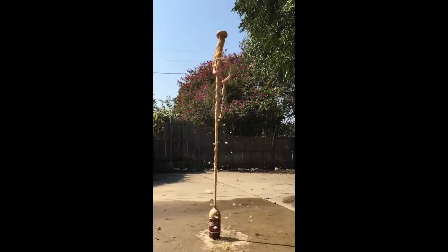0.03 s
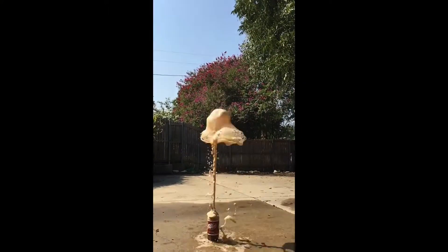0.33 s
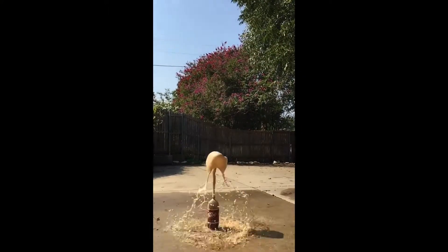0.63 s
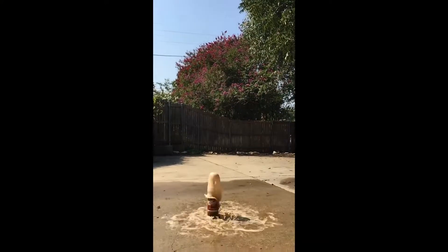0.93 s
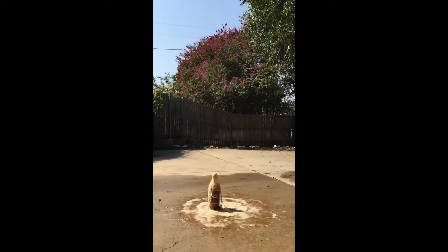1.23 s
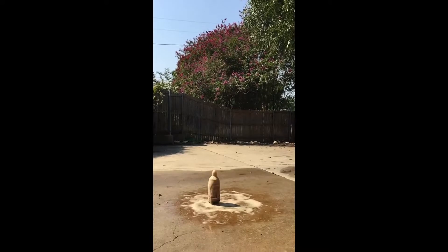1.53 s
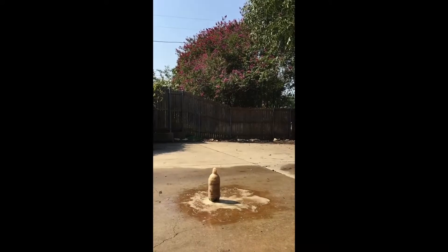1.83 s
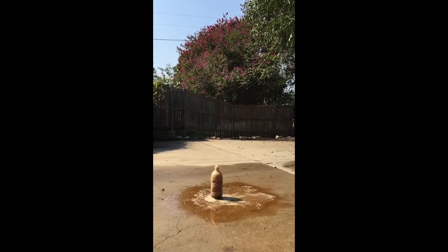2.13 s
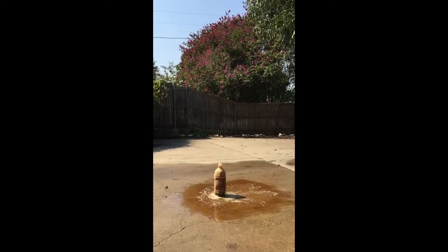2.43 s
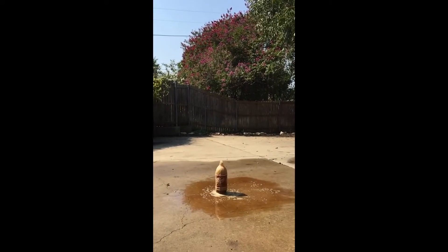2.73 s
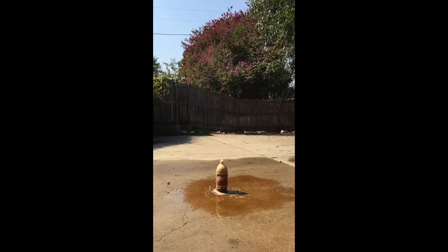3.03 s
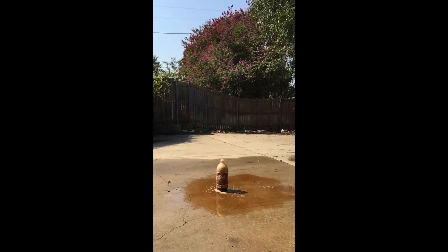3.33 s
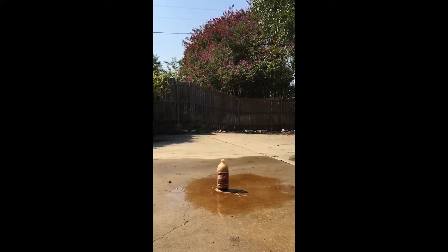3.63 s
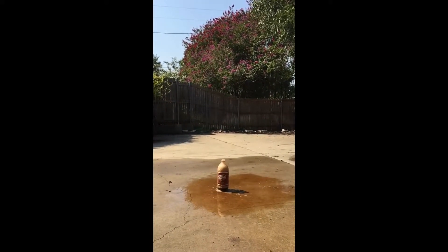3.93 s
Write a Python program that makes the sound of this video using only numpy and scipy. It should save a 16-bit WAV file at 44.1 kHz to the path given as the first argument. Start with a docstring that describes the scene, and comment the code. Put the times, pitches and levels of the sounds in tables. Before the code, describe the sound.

Falling soda slaps and splashes on concrete nearby, ending in a crackling splash of foam. The puddle fizzes softly and drips while birds whistle and twitter across the yard and faraway traffic rumbles faintly.

```python
"""A fountain of soda sinks back into its bottle on a concrete patio. Blobs slap the ground amid fine spray,
a sheet of foam lands at once, and gushes stir bubbles in the puddle, which goes on fizzing and dripping.
A bird whistles falling notes down the yard; others call and twitter farther off.
Distant traffic rumbles throughout, and a faint rush swells at the end."""
import sys
import numpy as np
from scipy import signal
from scipy.fft import rfft, irfft
from scipy.io import wavfile

SR = 44100
rng = np.random.default_rng(int(sys.argv[2]) if len(sys.argv) > 2 else 0)


def unload_audio(sound):
    """Save the sound as a 16-bit wav file, at the path given as the first command line argument."""
    columns = np.transpose(np.atleast_2d(sound))
    # keep every value between -1 and 1, then stretch to whole-number steps
    steps = np.round(np.clip(columns, -1, 1) * 32767)
    wavfile.write(sys.argv[1], SR, steps.astype(np.int16))


N = 176400
TIME = np.arange(N) / SR


def from_db(db):
    """Decibels to gain."""
    return 10 ** (np.asarray(db) / 20)


def rms_one(x):
    """Scale to unit rms."""
    return x / np.sqrt(np.mean(x ** 2) + 1e-20)


def level(rows):
    """Gain over time from rows of t/s, level/dB."""
    return from_db(np.interp(TIME, *np.transpose(rows)))


def colour(x, spectrum, tilt_db_per_oct=0, pivot_hz=1800):
    """Shape a white signal by rows of f/Hz, density/dB, plus a tilt; unit rms."""
    hz, db = np.transpose(spectrum)
    octave = np.log2(np.maximum(np.fft.rfftfreq(N, 1 / SR), 1))
    shape_db = np.interp(octave, np.log2(hz), db) + tilt_db_per_oct * (octave - np.log2(pivot_hz))
    low_cut = np.minimum(2 ** octave / hz[0], 1) ** 2
    return rms_one(irfft(rfft(x) * from_db(shape_db) * low_cut, N))


def drift(rate_hz):
    """Linearly interpolated noise; unit rms."""
    return rms_one(np.interp(TIME * rate_hz, np.arange(N), rng.standard_normal(N)))


def grains(per_s, spread_db, t60_cycles, bands=18):
    """Random droplets or bubbles of uneven size, each ringing briefly; roughly white."""
    sizes = from_db(spread_db * np.minimum(rng.exponential(1, N), 4)) * rng.choice([-1, 1], N)
    clicks = sizes * (rng.random(N) < per_s / SR)
    band = rng.integers(0, bands, N)
    out = 0
    for k, hz in enumerate(np.geomspace(500, 15000, bands)):
        radius = from_db(-60 * hz / (t60_cycles * SR))
        feedback = [1, -2 * radius * np.cos(2 * np.pi * hz / SR), radius * radius]
        ring = signal.lfilter([1, 0, -1], feedback, clicks * (band == k) + 1e-18 * sizes)
        out = out + rms_one(ring) * np.sqrt(hz)
    return out


def burst(start_s, rise_s, decay_s, time=TIME):
    """Linear rise, exponential decay."""
    age_s = np.maximum(time - start_s, 0)
    return np.minimum(age_s / rise_s, 1) * np.exp(-np.minimum(age_s / decay_s, 20))


def echoed(x, echoes):
    """Add reflections from rows of delay/s, level/dB."""
    return x + sum(from_db(db) * np.interp(TIME - delay_s, TIME, x, left=0) for delay_s, db in echoes)


def slaps():
    """Each blob hits concrete: a pressure pulse, a push of displaced air, a crack, thrown droplets."""
    blobs = [(.0004, -6.5, 2470, -4), (.0117, -15.5, 3780, 3), (.021, -14, 3130, -2),
             (0.0244, -4.5, 4170, 5), (0.0259, -13, 3840, 6.5), (0.065, -10.5, 2800, -13),
             (0.0711, -1, 3670, -1.5), (0.0777, -8, 3670, -2), (.116, -1.5, 4250, -0.5),
             (0.1164, -16.5, 1300, -4), (0.1207, -7, 2830, 7.5), (.1278, -11.5, 2890, 2),
             (.1463, -5, 3480, 0.5), (0.161, -12.5, 3280, 15), (.1665, -2, 3600, -12),
             (0.167, -2.5, 4200, -1.5), (.184, -5.5, 4070, -13), (0.1864, -10, 2019, 7),
             (.1919, -8, 4030, 2), (0.2056, -8.5, 3680, 0.5), (0.2238, -7.5, 3480, -3.5),
             (0.2292, -16.5, 1800, 12), (0.2288, -20, 790, 0), (0.2663, -21, 3380, 0),
             (0.2968, -14, 4120, -7), (.3113, -11.5, 4560, 2.5), (0.3412, -21.5, 4800, -16),
             (0.3514, -18.5, 4300, 2), (0.3659, 2.5, 3060, -11), (0.4084, -10.5, 2610, 4),
             (0.4166, -17.5, 1930, -10), (.4182, -12.5, 3450, 7), (0.4645, -12.5, 3250, 8),
             (0.4778, -16.5, 4480, 10), (.4919, -12, 2600, 4), (.5128, -10.5, 3600, 7),
             (0.5801, -20, 4500, 8), (0.608, -6.5, 3404, 2), (0.6127, -9.5, 2200, 12.5),
             (.6262, -4, 4700, -14), (.6419, -21, 584, -0.5), (0.6423, -9.5, 1650, 0),
             (0.6572, -11.5, 5200, -8), (.6955, -14, 4344, -8), (0.6994, -5, 4170, 0.5),
             (.841, -13.5, 4200, -2), (.921, -12.5, 2870, 4.5), (1.0016, -27, 1510, 13),
             (1.0691, -21.5, 2040, -1)]  # t/s, level/dB, f/Hz, splash offset/dB
    crack_spectrum = [(200, -20.5), (600, -11), (1300, -6), (3500, -3), (5000, -1.5), (8000, -9.5),
                      (16000, -21.5)]  # f/Hz, density/dB
    splatter_spectrum = [(200, -22), (600, -10), (1300, -0.5), (3500, -3.5), (5000, -1), (8000, -8),
                         (16000, -20)]  # f/Hz, density/dB
    rise_cycles = 0.68
    push_db, push_s = -26, 0.00019
    crack_s, splatter_s, splatter_db = 0.0008, 0.008, -23.5
    pulses, crack_power, splatter_power = np.zeros((3, N))
    for start_s, db, hz, splash_db in blobs:
        span = slice(int(start_s * SR), int((start_s + 0.2) * SR))
        t = TIME[span]
        age_s = np.maximum(t - start_s, 0)
        swell = age_s * hz / rise_cycles
        pulses[span] += from_db(db) * (swell * np.exp(1 - swell)) ** 2 * np.sin(2 * np.pi * hz * age_s)
        splash = from_db(db + splash_db)
        spread = age_s / push_s
        pulses[span] += splash * from_db(push_db) * spread * (2 - spread) * np.exp(1 - spread)
        crack_db = -12 + 6 * np.log2(hz / 3700)  # small, sharp blobs crack harder
        crack_power[span] += (splash * from_db(crack_db) * burst(start_s, 1 / SR, crack_s, t)) ** 2
        splatter_power[span] += (splash * from_db(splatter_db) * burst(start_s, crack_s, splatter_s, t)) ** 2
    cracks = np.sqrt(crack_power) * colour(rng.standard_normal(N), crack_spectrum)
    droplets = colour(grains(per_s=7000, spread_db=5 - 3, t60_cycles=2.2), splatter_spectrum)
    return pulses + cracks + np.sqrt(splatter_power) * droplets


def spray():
    """Fine drops tick on the concrete."""
    envelope = [(0, -33.5), (.05, -34), (.1, -33), (.19, -36.5), (.26, -34.5), (.35, -45.5), (.4, -39),
                (.48, -29.5), (.54, -36.5), (.6, -41), (.8, -34.5), (1.1, -85)]  # t/s, level/dB
    spectrum = [(200, -19.5), (500, -8), (1200, -5), (2500, 1.5), (4000, 2), (5000, -3.5), (8000, -7),
                (10500, -12), (13000, -10), (16000, -12)]  # f/Hz, density/dB
    return level(envelope) * colour(grains(per_s=4500, spread_db=5, t60_cycles=2.4), spectrum)


def fizz():
    """Tiny bubbles burst in the foam on the ground."""
    envelope = [(0, -48), (1.0, -42), (1.07, -54), (1.125, -47), (1.17, -54), (1.3, -54), (1.55, -62),
                (1.9, -64), (2.4, -66.5), (3.2, -69.5), (4, -71.5)]  # t/s, level/dB
    spectrum = [(300, -13), (1000, -4), (2500, 0), (4000, 0), (5000, -3), (6500, -5), (9000, -5.5),
                (10300, -6.5), (11500, -5), (16000, -7)]  # f/Hz, density/dB
    return level(envelope) * colour(grains(per_s=14000, spread_db=-0.5, t60_cycles=2), spectrum)


def rumble(db=-49.5):
    """Low noise of distant traffic and air."""
    spectrum = [(20, -30), (40, -19), (55, -6.5), (70, 1), (95, -5), (120, -1.5), (160, -7), (230, -11.5),
                (320, -22), (500, -30.5), (800, -32), (1500, -37), (4000, -44), (16000, -59)]  # f/Hz, density/dB
    return from_db(db) * colour(rng.standard_normal(N), spectrum)


def gushes(rise_s=0.0032):
    """Liquid falling into the puddle stirs up clouds of short-lived bubbles."""
    events = [(0.114, -30, 0.099, 1.5), (.366, -31, .05, 2), (.412, -32, 0.049, -6),
              (0.608, -24.5, 0.022, -7), (0.877, -33, 0.056, -7), (0.919, -35.5, 0.046, -2.5),
              (1.075, -48, 0.12, -7)]  # t/s, level/dB, decay/s, tilt/(dB/oct)
    spectrum = [(150, -23.5), (400, -15.5), (800, -9), (1300, 0.5), (2200, 3.5), (3200, 1), (5000, -16.5),
                (10000, -24), (16000, -35.5)]  # f/Hz, density/dB
    bubbles = grains(per_s=3500, spread_db=4, t60_cycles=4.8)
    return sum(from_db(db) * burst(start_s, rise_s, decay_s) * colour(bubbles, spectrum, tilt)
               for start_s, db, decay_s, tilt in events)


def foam_sheet():
    """A sheet of foam lands as a dense crackle, then its spray thins out."""
    spectrum = [(200, -21), (500, -17.5), (900, -14.5), (1400, -7.5), (2500, -4), (4000, -2), (4800, -5.5),
                (5600, -2.5), (7500, -11), (10500, -14.5), (12500, -13.5), (16000, -17)]  # f/Hz, density/dB
    start_s, rise_s, start_db, fall_db_per_s = 0.6047, 0.012, -21, 63
    thin_s, thin_db_per_s = 0.88, 162
    age_s = np.maximum(TIME - start_s, 0)
    db = start_db - fall_db_per_s * age_s - thin_db_per_s * np.maximum(TIME - thin_s, 0)
    crackle = colour(grains(per_s=12000, spread_db=4.5, t60_cycles=2.15), spectrum)
    return np.minimum(age_s / rise_s, 1) * from_db(db) * crackle


def falling_notes(notes, waver, sag_per_s=0.472, rise_s=0.036):
    """Near-pure tones that swell, sag and fade; waver and sag are fractions of the pitch."""
    wobble = 1 + waver * drift(rate_hz=250)
    out = 0
    for start_s, length_s, db, hz in notes:
        age_s = np.clip(TIME - start_s, 0, length_s)
        phase = 2 * np.pi * np.cumsum(hz * (1 - sag_per_s * age_s) * wobble) / SR
        envelope = np.minimum(age_s / rise_s, 1) * np.cos(np.pi / 2 * age_s / length_s)
        out = out + from_db(db) * envelope * np.sin(phase)
    return out


def whistles():
    """A bird down the yard repeats a falling whistle."""
    notes = [(1.22, 0.089, -47.5, 2540), (1.425, 0.097, -39, 2510), (1.62, 0.13, -39.5, 2519),
             (1.83, 0.12, -44.5, 2495), (2.027, 0.16, -44, 2506)]  # t/s, length/s, level/dB, start f/Hz
    return falling_notes(notes, waver=0.0068)


def twitters(width_hz=650):
    """Thin, hoarse notes of small birds, blurred by fast flutter and foliage."""
    notes = [(1.62, 0.11, -72, 8600), (1.72, 0.19, -71, 6250), (1.85, 0.28, -69.5, 6000),
             (2.784, 0.057, -69, 8470), (2.777, 0.042, -72, 7330), (3.55, 0.057, -77.5, 7450),
             (3.76, 0.15, -75.5, 8100), (3.829, .06, -73.5, 7400)]  # t/s, length/s, level/dB, f/Hz
    out = 0
    for start_s, length_s, db, hz in notes:
        progress = np.clip((TIME - start_s) / length_s, 0, 1)
        envelope = np.sqrt(np.maximum(np.sin(np.pi * progress), 0))
        phase = 2 * np.pi * hz * TIME
        noise_band = drift(width_hz) * np.sin(phase) + drift(width_hz) * np.cos(phase)
        out = out + from_db(db) * envelope * noise_band
    return out


def far_calls():
    """Farther bird calls, less steady in pitch."""
    notes = [(1.74, 0.045, -43.5, 2310), (1.945, 0.035, -35.5, 2340), (2.15, .06, -45.5, 2347),
             (2.08, .06, -60, 3380), (2.17, 0.078, -52.5, 3120), (2.25, 0.13, -61, 2880)]  # t/s, length/s, level/dB, start f/Hz
    return falling_notes(notes, waver=0.017)


def drips(tick_db=-11, tick_s=0.009):
    """Each last drip ticks and rings a small bubble."""
    events = [(2.5911, -53, 1410, 0.044), (2.9003, -45, 2880, 0.036), (2.9388, -54.5, 1610, .055)]  # t/s, level/dB, f/Hz, t60/s
    tick_spectrum = [(1000, -20.5), (2000, -4), (3800, -3), (4800, -15), (16000, -23)]  # f/Hz, density/dB
    noise = colour(rng.standard_normal(N), tick_spectrum)
    out = 0
    for start_s, db, hz, t60_s in events:
        bubble = burst(start_s, 1 / hz, t60_s / np.log(1000)) * np.sin(2 * np.pi * hz * (TIME - start_s))
        tick = from_db(tick_db) * burst(start_s, 1 / hz, tick_s) * noise
        out = out + from_db(db) * (bubble + tick)
    return out


def far_rush():
    """A faint, far-off rush swells in the midrange."""
    envelope = [(3.2, -84.5), (3.8, -75), (3.93, -68), (4, -70.5)]  # t/s, level/dB
    spectrum = [(250, -4), (500, 1), (1100, -4), (1400, 0.5), (1750, -7), (2150, -0.5), (2800, -16),
                (8000, -33.5)]  # f/Hz, density/dB
    return level(envelope) * colour(rng.standard_normal(N), spectrum)


def scene():
    """Soda, birds and outdoor background; mono."""
    yard_echoes = [(.005, -20.5), (.0135, -22), (.047, -25.5), (.071, -27)]  # house wall and fence: delay/s, level/dB
    bird_echoes = [(.022, -7), (0.126, -18)]  # delay/s, level/dB
    soda = echoed(slaps() + spray() + foam_sheet() + gushes(), yard_echoes) + fizz() + drips()
    birds = echoed(whistles() + far_calls() + twitters(), bird_echoes)
    return (soda + birds + rumble() + far_rush())[None]


def record(dry, cutoff_hz=15900):
    """Clip at full scale, then low-pass steeply."""
    low_pass = signal.ellip(10, 0.1, 80, cutoff_hz, fs=SR, output="sos")
    return signal.sosfilt(low_pass, np.clip(dry, -1, 1))


dry = scene()
out = record(dry)
unload_audio(out)
```